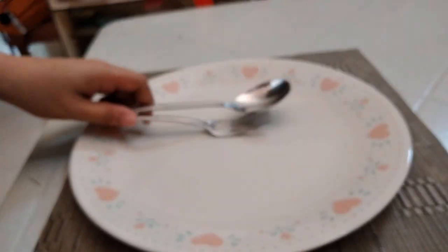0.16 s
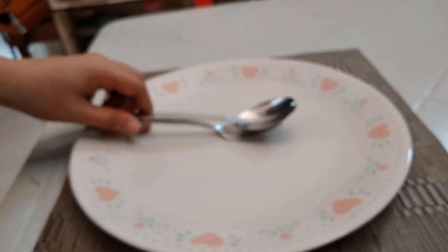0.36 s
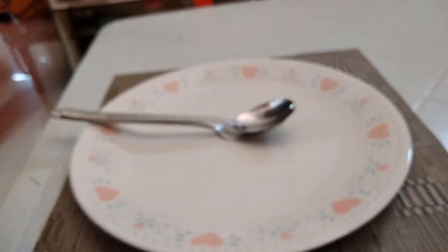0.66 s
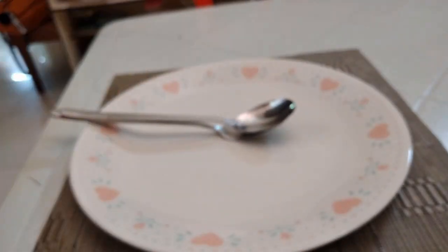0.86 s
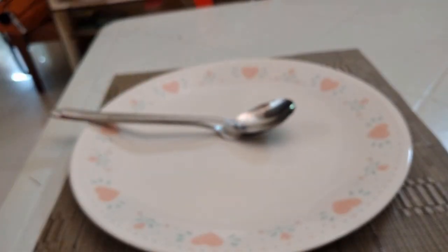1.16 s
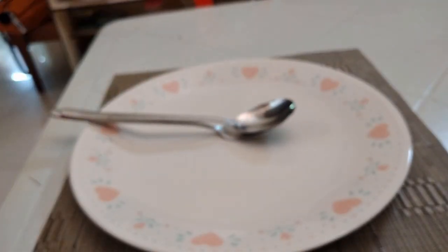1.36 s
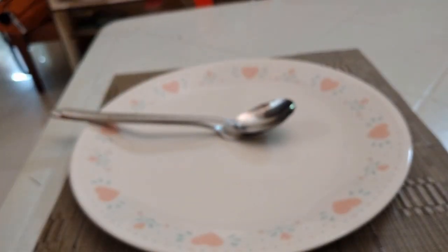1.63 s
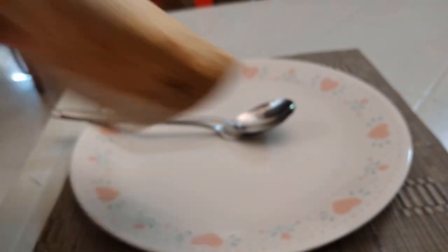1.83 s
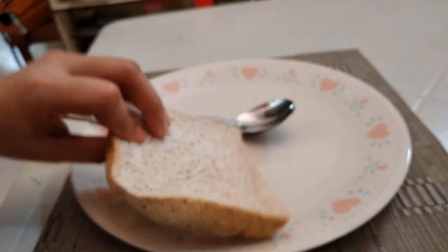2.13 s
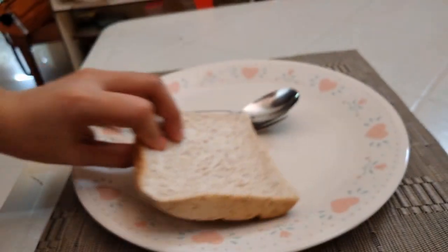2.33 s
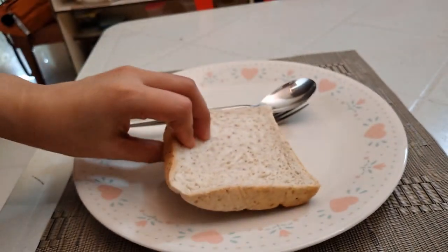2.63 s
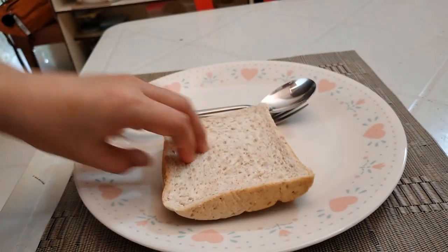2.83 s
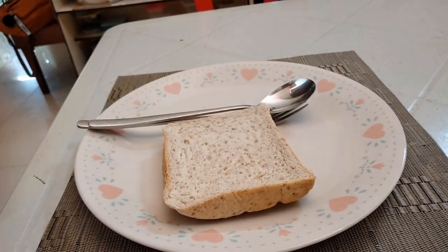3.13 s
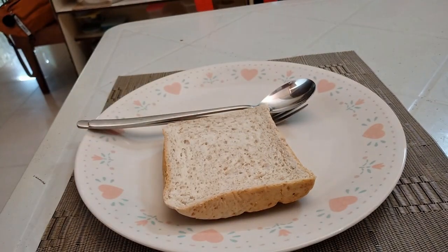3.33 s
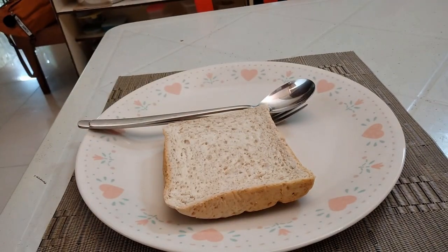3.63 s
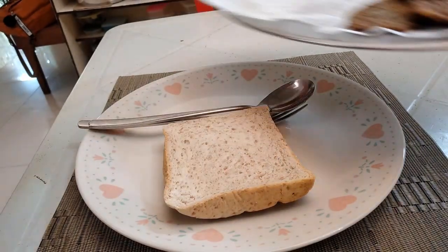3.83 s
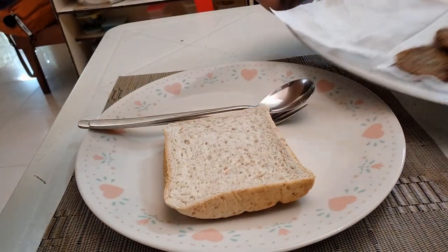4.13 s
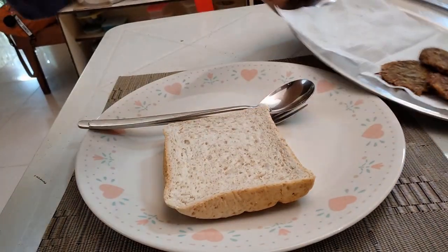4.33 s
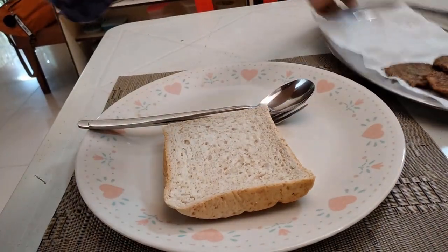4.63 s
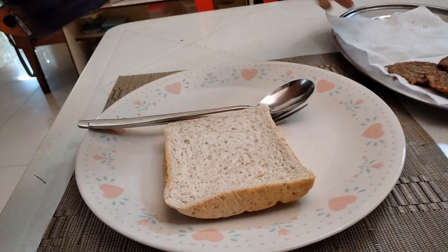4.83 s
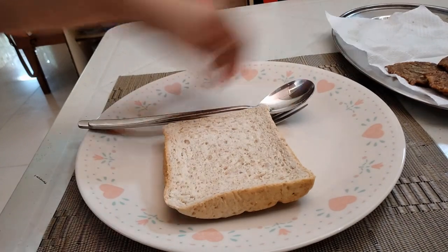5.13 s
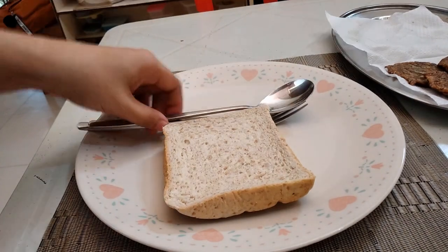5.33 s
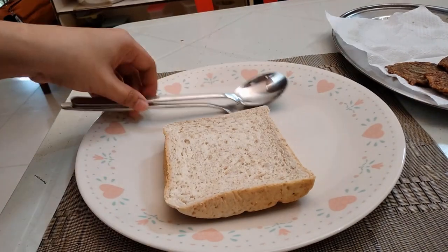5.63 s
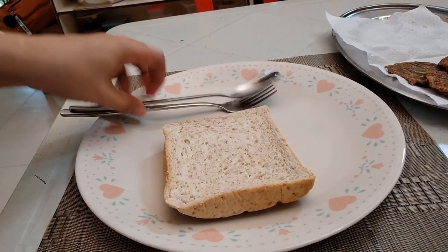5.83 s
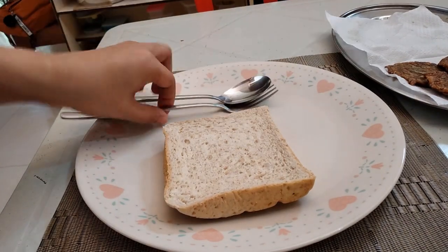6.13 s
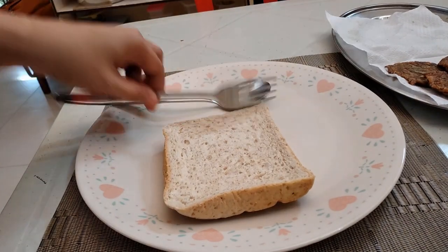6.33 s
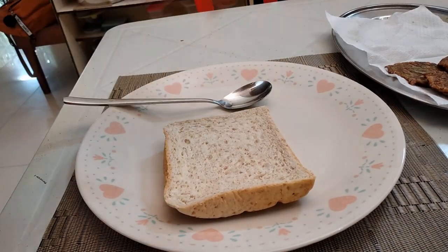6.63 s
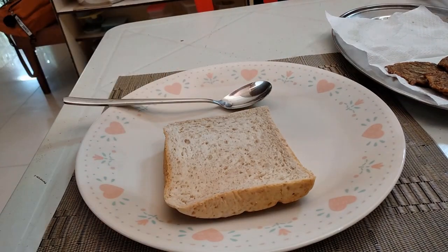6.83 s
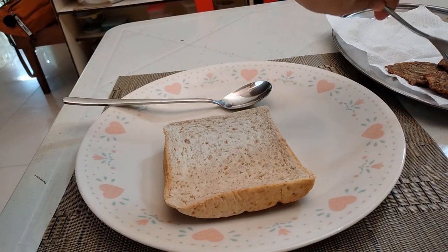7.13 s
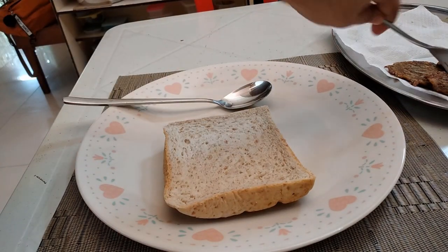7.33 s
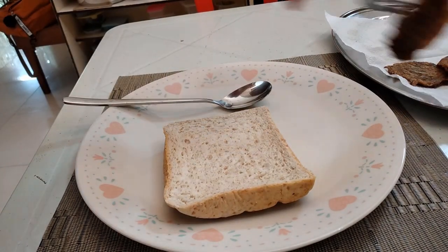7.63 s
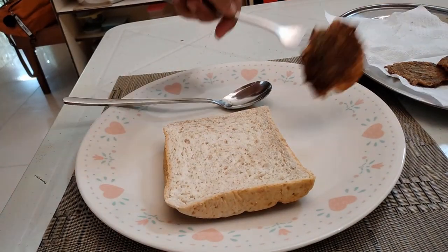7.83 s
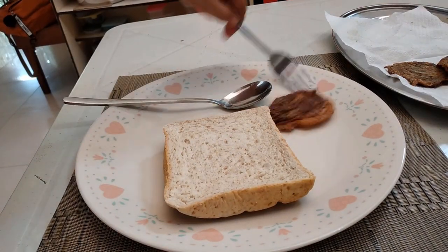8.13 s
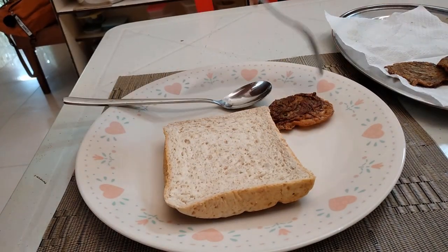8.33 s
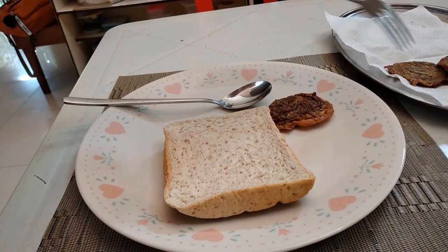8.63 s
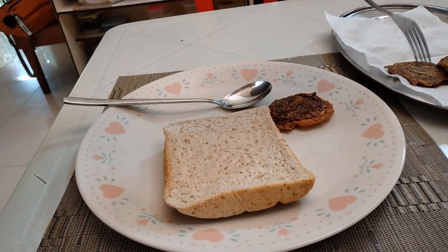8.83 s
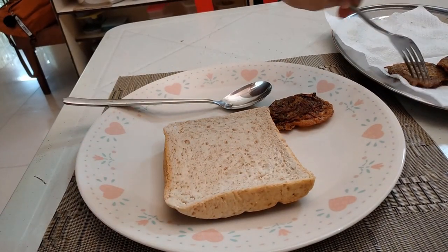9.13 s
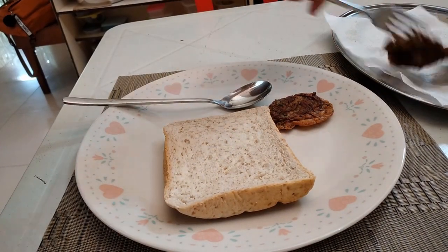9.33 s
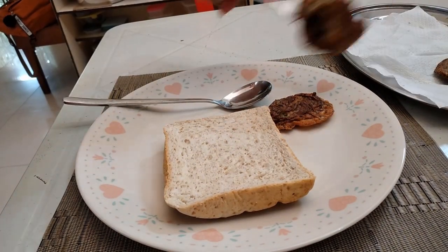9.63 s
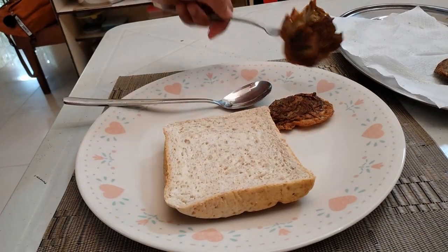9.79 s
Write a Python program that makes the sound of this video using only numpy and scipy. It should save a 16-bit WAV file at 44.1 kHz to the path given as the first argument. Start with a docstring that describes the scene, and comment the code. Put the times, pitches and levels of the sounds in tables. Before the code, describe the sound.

In a hard-walled room, cutlery drops on a plate, a wrapper crinkles, a dragged object groans, a tray thuds, and steel clatters apart.

```python
"""Over a quiet hum and rumble, a spoon and fork tap, then drop on a glass-ceramic plate in a hard-walled room.
Wrapping rustles amid soft thuds, then a hollow object is dragged over the table by stick and slip.
Next a metal tray is set down with a few knocks; the cutlery is rattled apart; a fork lifts food off paper.
Contacts are pulses, noise bursts and decaying modes; rubbing is coloured grains; squeaks are gliding resonances.
All sounds but the hum and rumble also feed a diffuse reverberant tail."""
import sys
import numpy as np
from scipy import signal
from scipy.fft import rfft, irfft
from scipy.io import wavfile
from scipy.ndimage import uniform_filter1d, map_coordinates

SR = 44100
rng = np.random.default_rng(int(sys.argv[2]) if len(sys.argv) > 2 else 0)


def master(y):
    """Save y as 16-bit WAV."""
    cut = np.clip(np.atleast_2d(y).T, -1, 1)
    pcm = np.round(cut * 32767)  # scale
    wavfile.write(sys.argv[1], SR, pcm.astype(np.int16))


N = 439236

# All levels in the tables are relative; each layer has its own gain.
# Stationary background spectra. Each row: frequency in Hz, density in dB per Hz.
ROOM_TONE = [(65, -24), (110, -1), (135, -2.5), (210, -6), (265, -4), (400, -12), (500, -12), (650, -15.5),
             (900, -18.5), (2200, -23), (3000, -34), (4000, -36), (7100, -30.5), (11000, -45),
             (16000, -49.5)]
RUMBLE = [(15, -2), (35, 5), (60, -2), (100, -2.5), (140, -17), (400, -53.5), (2000, -89.5)]
# Course of the low rumble. Each row: time in seconds, level in dB.
RUMBLE_LEVEL = [(0, -51.5), (.9, -51.5), (1.7, -56), (3.4, -59.5), (4.2, -56), (5.3, -58.5), (6.2, -48),
                (6.7, -51.5), (7.6, -52), (8.8, -51.5), (9.96, -59)]
HUM_DB = -53
DRONE_HZ, DRONE_WIDTH_HZ, DRONE_DB = 268.3, 6, -66.5  # one narrow tone stands out of the hum

# Correlation of the two microphone ports. Each row: frequency in Hz, likeness (clipped where it is used).
LIKENESS = [(30, 0.5), (70, 2.5), (160, 1.1), (300, 0.9), (550, 0.3), (1200, -0.14), (2500, 0.04),
            (6000, -0.04), (16000, 0.93)]
# Balance of sounds on the plate and of other sounds. Each row: frequency in Hz, left-right difference in dB.
PLATE_SIDE = [(200, -6), (700, 3), (1300, 0), (2400, -1), (4400, 1.5), (7200, 11.5), (9000, -3.5),
              (11000, -13.5), (15000, -16.5)]
FAR_SIDE = [(200, 0.5), (1300, 0), (2400, 1), (4400, 2), (7500, 9.5), (10000, -17), (15000, -15)]
# Reverberant tail. Each row: frequency in Hz, t60 in seconds, level in dB.
TAIL = [(60, 1, -12), (200.7, 0.39, -8), (599.6, 0.71, -9.5), (1540, 0.88, -10.5), (3040, 0.68, -5.5),
        (6995, 0.64, -10.5), (15030, 0.94, -17.5)]
CUTOFF_HZ = 15700

# Strokes of wrapping, sleeve and paper.
# Each row: nominal start in seconds, length in seconds, body level in dB, crinkle level in dB.
RUSTLES = [(0.853, 0.23, -47.5, -47.5), (1.095, 0.27, -47.5, -50), (1.309, 0.19, -44.5, -43),
           (1.437, 0.22, -50, -51.5), (2.9, .2, -57.5, -63), (3.13, 0.084, -58, -73),
           (3.385, 0.17, -63, -74.5), (3.584, 0.13, -52, -54), (3.689, 0.13, -48, -50.5),
           (5.56, 0.13, -57.5, -57), (5.724, 0.18, -62.5, -65.5), (6.863, 0.28, -68.5, -70),
           (7.58, 0.23, -63, -67.5), (7.829, 0.13, -84, -68), (8.53, 0.18, -60.5, -69.5),
           (8.961, 0.092, -64, -70), (9.208, 0.17, -62, -70), (9.562, 0.088, -76, -68.5),
           (9.7, 0.26, -63, -66)]
STROKE_SHAPE = 2.2  # squareness of each stroke's swell
FLUTTER_DB, FLUTTER_PER_S = 1.8, 140  # unevenness of the rubbing
# Single creases snapping. Each row: time in seconds, level in dB.
SNAPS = [(0.865, -41), (1.049, -43.5), (1.63, -44), (1.675, -42), (2.09, -46.5), (2.59, -49),
         (2.8243, -49.5), (3.105, -52), (3.1695, -54.5), (3.445, -55), (3.5716, -50), (3.6, -40),
         (3.7073, -45.5), (3.7372, -40)]
# Spectra of the rubbing and of the crinkling. Each row: frequency in Hz, density in dB per Hz.
RUSTLE_BODY = [(100, -2.5), (400, -3.5), (900, -6), (1500, -6.5), (2400, -5.5), (3400, -19.5), (5000, -18),
               (16000, -62)]
RUSTLE_CRINKLE = [(1000, -26.5), (3000, -7.5), (4500, -8), (7200, -0.5), (8800, -7), (11000, -5),
                  (13000, -20.5), (16000, -18)]

# A hollow object dragged over the table, its force fading.
DRAG_START_S, DRAG_STOP_S, DRAG_ATTACK_S, DRAG_RELEASE_S = 1.783, 2.872, 0.017, 0.24
DRAG_DB, DRAG_FADE_DB_PER_S = -37.5, 10.5
HISS_DB, HISS_FOLLOWS = -30, 0.76  # hiss level at unit judder; exponent on the judder
DRAG_WOBBLE_S, DRAG_WOBBLE_PER_S = 0.00094, 9  # its pitch wavers as the contact shifts
# It sticks, then breaks free. Each row: time in seconds, slip level in dB, judder surge in dB.
SHOVES = [(1.786, -25.5, -28.5), (1.807, -23, -36.5), (1.973, -27, -40), (2.054, -28.5, -43.5),
          (2.085, -35.5, -35.5), (2.117, -35, -34), (2.149, -27.5, -39), (2.186, -35.5, -41.5)]
SURGE_T60_S = 0.44
# Resonances of the hollow body. Each row: frequency in Hz, width in Hz, level in dB.
DRAG_BODY = [(344, 104, -4), (569, 270, -19), (693, 134, 3.5), (898.5, 9.7, 11.5), (1100, 84, -7),
             (1406, 23, 3), (1800, 110, -7.5), (2206, 29, -4), (2560, 19, -1.5), (2336, 50, -8),
             (2740, 28, -6.5), (3450, 38, -12.5)]
# Spectrum of the contact hiss. Each row: frequency in Hz, density in dB per Hz.
DRAG_HISS = [(1470, -29), (2500, -2.5), (3160, -17), (3460, -11.5), (5740, -9.5), (7020, -4.5),
             (10600, -20), (16000, -43)]
# The main resonance shifts with the pull. Each row: time in seconds, frequency in Hz.
GROAN_PITCH = [(1.79, 700), (1.85, 740), (1.93, 690), (2.0, 804), (2.14, 800), (2.5, 784), (2.68, 720)]

# Squeaks and scrapes of things rubbing. Each row: start in seconds, length in seconds, first frequency in Hz,
# last frequency in Hz, width in Hz, level in dB, room feed in dB relative to the direct sound.
SQUEAKS = [(2.915, 0.12, 1520, 1750, 710, -53.5, 8), (2.924, 0.1, 2960, 2600, 414, -55, 8.5),
           (2.917, 0.19, 5610, 5610, 250, -67.5, 3.5), (2.745, .1, 2380, 2380, 200, -59, 3),
           (5.093, 0.024, 1630, 1530, 60, -43, 6), (6.347, 0.02, 1950, 2010, 301, -40, 2),
           (6.358, .024, 2550, 2650, 340, -36, 2), (6.4, 0.014, 4500, 9200, 1188, -38.5, 3),
           (8.379, .04, 6800, 7300, 2200, -57, 6), (8.365, .06, 7100, 7100, 350, -53.5, -0.5),
           (9.17, 0.1, 1650, 1800, 600, -63.5, 6), (9.29, .1, 3600, 4000, 870, -70.5, 12),
           (9.285, 0.12, 2200, 2900, 900, -61, 5), (9.385, 0.1, 2500, 3300, 550, -59.5, 4)]
SQUEAK_JUDDER_DB, SQUEAK_JUDDER_PER_S = 3.5, 210  # stick and slip

# Things set down on the table. Each row: time in seconds, table thud in dB, tray clack in dB, rim scratch in dB,
# favoured mode in Hz, its level in dB, its t60 in seconds.
KNOCKS = [(0.395, -47, -59.5, -59.5, 75, -29.5, 0.16), (0.499, -35.5, -42.5, -39, 178, -22, 0.085),
          (0.506, -40, -56, -54, 96, -29, 0.26), (0.51, -40.5, -55, -56, 36, -29.5, .15),
          (1.121, -35, -39, -47, 477, -33, 0.24), (1.137, -30, -51, -63.5, 138, -32.5, 0.23),
          (1.176, -34.5, -59.5, -60, 168, -35, 0.17), (4.4115, -27, -21, -29, 2345, -26, .05),
          (4.445, -31, -35, -34.5, 62, -29, .15), (4.491, -19.5, -27, -44.5, 270, -27, 0.18),
          (4.524, -34, -41, -53, 397, -36.5, .12), (4.7805, -13.5, -15.5, -35.5, 332, -14.5, 0.086),
          (4.7824, -24, -29.5, -51.5, 166, -17, 0.14), (4.808, -25, -46, -54, 398, -27, .14),
          (4.856, -37, -37, -61.5, 298.4, -32, .08), (4.9057, -27.5, -33.5, -71.5, 1710, -34, .04),
          (4.9139, -36.5, -45.5, -80, 162, -20, .1), (4.998, -38, -48.5, -75, 174.6, -34, .1),
          (8.1357, -39, -36, -69.5, 112, -42, 0.11)]
# Modes of table top and tray. Each row: frequency in Hz, level in dB, t60 in seconds, left-right in dB.
TABLE_MODES = [(40, -9.5, 0.41, 0.0041), (83.9, -11, 0.086, 0.0048), (125, -7, 0.1, 0.0045),
               (165.5, 5, 0.071, 0.0048), (268.5, -8, 0.33, 0.0014), (301, -3, 0.099, 0.0036),
               (404, -10, 0.16, 0), (519, -10, 0.1084, 0.0076)]
TRAY_MODES = [(630, -11.5, 0.14, 0.0016), (1083, -7, 0.63, 0.0034), (1600, -26, 0.63, 0.0077),
              (1210, 0, 0.07, 0.0021), (1600, 6.5, 0.04, 0.0034), (1690, -1, 0.046, 0.0045),
              (1834, 4, 0.049, 0.0056), (2090, -19, 0.22, 0.00054), (2345, -18.5, 0.19, 0.018)]
# The crowd of quickly damped modes in each body. Each row: frequency in Hz, density in dB per Hz.
TABLE_CRACK = [(20, -6), (45, -0.5), (90, 0), (160, -1), (300, -5), (550, -10), (1000, -17), (3000, -51),
               (16000, -101)]
TRAY_CRACK = [(100, -10), (500, -11), (1000, 2), (1700, 3.5), (2400, 6), (3100, -23), (5000, -52.5),
              (16000, -72.5)]
RIM_CRACK = [(500, -40.5), (2500, -2), (4200, -2.5), (7000, 1.5), (9000, -10.5), (12000, -16.5),
             (16000, -37)]
PLATE_CRACK = [(60, -8), (170, -4.5), (450, -12.5), (900, -7.5), (1600, -2.5), (2300, -1), (3200, -6),
               (4500, -15), (7000, -26), (16000, -51)]
STEEL_CRACK = [(300, -27.5), (2000, -14), (3400, -4), (4300, 4), (5550, -2.5), (6200, 2.5), (6700, -0.5),
               (7100, 8), (7700, -4), (8100, -5.5), (8800, -9), (11000, -13), (13500, -27), (16000, -29.5)]

# Taps of hand-held cutlery, where one mode survives the grip. Each row: time in seconds, plate level in dB,
# steel level in dB, favoured mode in Hz, its level in dB, its t60 in seconds.
TAPS = [(0.1371, -38, -49, 4124, -42, .28), (.141, -32.5, -48, 2803, -43.5, 0.2),
        (0.246, -35, -38.5, 13250, -48, 0.15), (0.2621, -38, -39.5, 2033, -34, 0.11),
        (0.272, -47.5, -41.5, 4150, -43.5, .2), (0.28, -45.5, -44.5, 2740, -46.5, 0.17),
        (0.396, -23.5, -28, 4188, -24.5, .03), (.413, -36, -49.5, 2207, -37, .03),
        (0.426, -37.5, -48.5, 2046, -36, .025), (8.14, -43.5, -55, 1598, -53, 0.11),
        (8.148, -46.5, -50.5, 2660, -48, .06), (8.252, -51, -44.5, 7060, -33, 0.14),
        (8.259, -45, -49, 11000, -53, 0.18)]
# Contacts of loose cutlery, with the same columns: time in seconds, plate in dB, steel in dB,
# favoured mode in Hz, its level in dB, its t60 in seconds.
CLINKS = [(0.4983, -20, -19, 6975, -17.5, 0.06), (0.5045, -30, -26.5, 6450, -19, .07),
          (0.5112, -27.5, -28, 7490, -21, 0.055), (0.519, -37, -26, 6920, -19.5, .06),
          (0.526, -38.5, -32, 7380, -32, .06), (5.823, -43.5, -52.5, 2014, -53, .05),
          (5.882, -50, -55.5, 7200, -58.5, .1), (5.902, -41, -50.5, 2310, -53, .1),
          (5.9454, -25, -27.5, 712, -20, 0.04), (5.9504, -22.5, -27.5, 1190, -17, 0.04),
          (5.9568, -23, -19.5, 6980, -24, 0.08), (5.9636, -19, -25.5, 7960, -29, .1),
          (6.0641, -23, -16.5, 7150, -20, 0.06), (6.066, -28, -29, 700, -26, 0.062),
          (6.077, -29.5, -27.5, 4448, -24, 0.08), (6.0885, -29, -18, 6385, -19, 0.13),
          (6.1066, -24.5, -27, 6650, -25.5, 0.068), (6.1305, -28.5, -27, 5963, -20.5, 0.075),
          (6.1705, -32.5, -30.5, 6340, -29.5, 0.078), (6.2163, -36.5, -34, 2524, -37.5, 0.12),
          (6.3445, -37.5, -49.5, 1964, -41.5, .05), (6.3744, -34, -28.5, 4494, -36, 0.11),
          (6.4, -32.5, -35.5, 8750, -39.5, 0.08), (6.4218, -29, -30, 10300, -33.5, 0.04),
          (6.438, -15.5, -18, 6170, -13.5, 0.035), (6.4461, -17.5, -25.5, 8000, -21, .07),
          (6.451, -20.5, -23, 2257, -20.5, 0.086), (6.461, -24, -27, 6970, -23, .07),
          (6.4823, -27, -30.5, 2520, -23.5, .08), (6.488, -25.5, -26.5, 2276, -22, .08),
          (6.502, -32, -23.5, 5780, -16, 0.051), (6.5165, -26, -28.5, 6200, -17, .07),
          (6.533, -31, -22, 5900, -21, 0.044), (6.5688, -30.5, -35, 2383, -48, 1),
          (6.613, -34, -50, 2570, -55, 0.46)]
# Dry clacks of steel pressed onto the plate.
# Each row: time in seconds, level in dB, frequency in Hz, swell in milliseconds.
CLACKS = [(0.1371, -25.5, 1500, .5), (0.3947, -6.5, 2000, .55), (0.398, -16.5, 2300, .2),
          (6.4209, -4, 2300, .22), (6.4273, -6, 2900, .17), (6.4312, -5.5, 2500, .3),
          (6.4376, -8.5, 2200, .3), (6.4513, -7.5, 2200, 0.24), (6.4556, -8, 2300, .25),
          (6.4656, -16, 2300, .35), (6.4829, -20.5, 2500, 0.28), (6.4883, -17, 2200, 0.53),
          (6.51, -16, 2300, 0.33), (6.526, -11.5, 2500, .25)]
CLACK_LEAD_RAD, CLACK_SIDE_DB = .4, -1  # phase lead left and lag right; left-right level
# Loose spoon and fork chattering on the plate. Each row: start in seconds, length in seconds, plate level in dB,
# steel level in dB, table level in dB, plate fade in dB/s, steel fade in dB/s.
RATTLES = [(0.497, 0.014, -33.5, -24, -38, 300, 451.5), (5.9443, 0.03, -23, -18, -32, 280.5, 198),
           (6.0773, 0.11, -25.5, -20.5, -40.5, 106.5, 70.5), (6.443, 0.044, -23, -20, -43, 184.5, 233.5),
           (6.501, .09, -26.5, -29, -48.5, 82, 71)]
CHATTER_GAP_S, CHATTER_JITTER = .011, 0.32  # jitter as a share of the gap
CHATTER_SCATTER_DB, SETTLE_DB_PER_S = 2, 601  # greatest scatter either way; final fade
# Modes of plate, spoon, fork and gripped handle.
# Each row: frequency in Hz, level in dB, t60 in seconds, left-right in dB.
PLATE_MODES = [(808, -16, 0.11, -0.5), (1188, -13.5, 0.14, -5.5), (1475, -5.5, 0.1, 2),
               (1730, -12, 0.042, -2.5), (2020, -7, 0.03, 3), (2180, -3.5, 0.011, -2), (2247, 4, 0.013, 3),
               (2600, -6.5, 0.054, 1.5), (2900, -16, 0.083, 6), (3517, -2, 0.03, 2)]
SPOON_MODES = [(4144, -7, .2, 5), (5020, -5, .17, 0), (5988, -3, .2, 6), (6175, -8, .2, 3),
               (6385, -3, .22, 10), (6955, -3, .15, 10), (7015, 0, .15, 10), (8118, -6, .18, 4),
               (9283, -22, .22, -5), (10562, -12, .25, -20), (10920, -22, .2, -15), (11866, -13, .22, -18),
               (12428, -18, .22, -16), (13320, -23, .25, -11), (15050, -31, .2, 1)]
FORK_MODES = [(2240, 0, .22, -7), (2325, -4, .18, -4), (2483, 1, .27, -4), (2606, -2, .27, 0),
              (4312, -7, .2, -1), (4490, -6, .17, 1), (5028, -10, .2, 0), (5963, 3, .22, 7),
              (6087, -3, .17, 4), (7128, 0, .22, 11), (7854, -11, .2, 5), (10290, -17, .2, -7),
              (13660, -21, .15, -14)]
HANDLE_MODES = [(785, -2.5, .3, 0), (1430, -1.5, 0.23, 3.5), (2800, -3.5, .22, 0.5),
                (3340, -10.5, 0.16, 2.5), (5047, -10.5, 0.27, 8.5)]
# The many weak overtones of the steel.
CROWD_LOW_HZ, CROWD_HIGH_HZ, CROWD_T60_S = 2850, 12850, 0.13
PARTED_S = 5.5
NESTED_DB = -10.5  # until they are parted, the spoon lies nested in the fork, which damps its ring


def from_db(db):
    """Amplitude ratio from its logarithmic level."""
    return 10 ** (np.asarray(db) / 20)


def rms_one(x):
    """Normalization to unit root-mean-square."""
    return x / np.sqrt(np.mean(x ** 2) + 1e-20)


def at_hz(points, hz, axis=1):
    """Interpolation of one table column on a logarithmic frequency axis."""
    points = np.array(points, float)
    return np.interp(np.log(np.maximum(hz, 1)), np.log(points[:, 0]), points[:, axis])


def convolve(x, response):
    """Linear filtering as convolution with an impulse response."""
    x, response = np.float32(x), np.float32(response)
    return signal.oaconvolve(np.atleast_2d(x), np.atleast_2d(response), axes=-1)[:, :N]


def causal(gain):
    """Minimum-phase response: folding the cepstrum gives the given gain per frequency causally."""
    cepstrum = irfft(np.log(gain + 1e-7))
    half = cepstrum.shape[-1] // 2
    cepstrum[..., 1:half] *= 2
    cepstrum[..., half + 1:] = 0
    return irfft(np.exp(rfft(cepstrum)))


def panned(db):
    """Constant-power panning: left and right gains for a level difference."""
    pair = from_db(np.array([db, -db]) / 2)
    return pair / np.sqrt(np.mean(pair ** 2, axis=0))


def colour(pair, spectrum, balance, size=4096):
    """Spectral shaping and partial correlation turn two unrelated white signals into one stereo sound."""
    hz = np.fft.rfftfreq(size, 1 / SR)
    alike = np.clip(at_hz(LIKENESS, hz), -.98, .98)
    mid, side = convolve(pair, causal(np.sqrt(np.array([1 + alike, 1 - alike]) / 2)))
    gain = rms_one(from_db(at_hz(spectrum, hz)))
    return convolve([mid + side, mid - side], causal(gain * panned(at_hz(balance, hz))))


def white():
    """White noise: two unrelated signals of flat spectrum."""
    return rng.standard_normal((2, N))


def grains(per_s, spread_db):
    """Shot noise: random tiny clicks of uneven size, scaled to unit rms."""
    sizes = from_db(spread_db * np.minimum(rng.exponential(1, N), 4))
    return rms_one((rng.random(N) < per_s / SR) * sizes * white())


def drift(per_s):
    """Smooth random modulation: wandering of spread about 1 between per_s knots a second."""
    knots = rng.standard_normal(4000)
    return map_coordinates(knots, [np.arange(N) / SR * per_s], order=3, mode="wrap")


def wobble(x, depth_s, per_s):
    """Doppler effect: a wandering delay bends the pitch slightly."""
    at = np.arange(N) + depth_s * SR * drift(per_s)
    return np.array([map_coordinates(channel, [at], order=3) for channel in x])


def moving_resonance(x, hz, width_hz):
    """Heterodyning: a low-pass in the rotating frame is a resonance whose centre follows hz."""
    turn = np.exp(2j * np.pi * np.cumsum(hz) / SR)
    r = np.exp(-np.pi * width_hz / SR)
    return np.real(turn * signal.lfilter([np.sqrt(2 * (1 - r * r))], [1, -r], x / turn + 1e-18))


def clicks(times, sizes):
    """Ideal impulses: one of the given size at each time."""
    out = np.zeros(N, np.asarray(sizes).dtype)
    out[np.clip(np.round(np.asarray(times) * SR).astype(int), 0, N - 1)] = sizes
    return out


def decaying_power(times, db, t60):
    """Exponential energy decay by 60 dB in t60 seconds after each event."""
    return signal.lfilter([1], [1, -from_db(-120 / (t60 * SR))], clicks(times, from_db(db) ** 2) + 1e-22)


def crack(times, db, t60, snap):
    """Impact on a body of dense modes: one sharp impulse and a quickly decaying burst of noise."""
    burst = np.sqrt(decaying_power(times, db, t60)) * white()
    return burst + snap * clicks(times, from_db(db)) * [[1], [0]]


def ring(times, db, modes, scatter_db, detune):
    """Modal synthesis: each contact excites every mode by its own amount, slightly detuned by its supports."""
    out = np.zeros((2, N))
    for hz, mode_db, t60, pan_db in modes:
        chance = rng.standard_normal((len(times), 3))
        sizes = from_db(db + mode_db + scatter_db * chance[:, 0]) * np.sign(chance[:, 1])
        t = np.arange(int(min(t60, 1) * SR)) / SR
        # the less alike the two ports, the further out of step
        lead = np.arccos(np.clip(at_hz(LIKENESS, hz), -1, 1)) / 2 * np.float32([[1], [-1]])
        fade = from_db(-60 * t / t60) * panned(pan_db)[:, None]
        for s, size, shift in zip(times, sizes, 1 + detune * chance[:, 2]):
            i = int(round(s * SR))
            tone = np.sin((2 * np.pi * hz * shift * t + lead).astype(np.float32)) * fade
            out[:, i:i + len(t)] += size * tone[:, :N - i]
    return out


def favoured(rows, side):
    """Point excitation: the place of each contact makes one mode ring out above the rest."""
    out = np.zeros((2, N))
    for at, *_, hz, db, t60 in rows:
        out += ring([at], db, [(hz, 0, t60, at_hz(side, hz))], scatter_db=-1.0, detune=0)
    return out


def rebounds(times, db, count, gap_s, loss_db):
    """Inelastic bouncing: each contact is followed by a few uneven, ever weaker rebounds."""
    chance = rng.random((len(times), count, 2))
    later = times[:, None] + np.cumsum(gap_s * (0.3 + 1.5 * chance[..., 0]), axis=1)
    weaker = db[:, None] - np.cumsum(2 * loss_db * chance[..., 1], axis=1) - loss_db
    return np.append(times, later), np.append(db, weaker)


def bounced(rows, gap_s, loss_db):
    """Double impact: each (s, dB, ..) contact lands again, lower by loss_db; returns the columns."""
    first = np.array(rows, float)
    second = np.column_stack([first[:, 0] + gap_s, first[:, 1:] - loss_db])
    return np.vstack([first, second]).T


def room_tone():
    """Stationary noise: a dull steady hum with one narrow drone, over low rumble that rises and falls."""
    rumble = from_db(np.interp(np.arange(N) / SR, *np.transpose(RUMBLE_LEVEL)))
    drone = moving_resonance(rng.standard_normal(N), np.full(N, DRONE_HZ), DRONE_WIDTH_HZ)
    out = from_db(DRONE_DB) * rms_one(drone) + colour(rumble * white(), RUMBLE, FAR_SIDE)
    return out + from_db(HUM_DB) * colour(white(), ROOM_TONE, FAR_SIDE)


def room(x, build_s):
    """Reverberation: reflections thicken into a diffuse tail that decays at its own rate in each octave."""
    t = np.arange(SR) / SR
    hz = np.fft.rfftfreq(SR, 1 / SR)
    alike = .86 * np.sinc(hz / 1100)  # long waves reach both ports alike
    mid, side = rfft(rng.standard_normal((2, SR)))
    noise = np.sqrt(1 + alike) * mid + np.sqrt(1 - alike) * side * [[1], [-1]]
    tail = 0
    for centre in 2. ** np.arange(5, 15):
        share = np.clip(1 - abs(np.log2(np.maximum(hz, 1) / centre)), 0, 1)
        fade = from_db(-60 * t / at_hz(TAIL, centre)) * (1 - np.exp(-(t / build_s) ** 2))
        level = from_db(at_hz(TAIL, centre, axis=2))
        tail = tail + irfft(noise * share) * fade / np.linalg.norm(fade) * level
    return convolve(x, tail / np.sqrt(2))


def rustle():
    """Friction of thin sheets: dense soft grains under sparser bright ones swell and fade with each stroke."""
    t, power = np.arange(N) / SR, np.zeros((2, N))
    for start, length, body_db, crinkle_db in RUSTLES:
        from_middle = np.abs(2 * (t - start) / length - 1)
        near = from_middle < 2
        swell = np.exp(-from_middle[near] ** STROKE_SHAPE)
        power[:, near] += (from_db([[body_db], [crinkle_db]]) * swell) ** 2
    body, crinkle = np.sqrt(power) * from_db(FLUTTER_DB * drift(FLUTTER_PER_S))
    rub = from_db(2.5) * colour(body * grains(per_s=7000, spread_db=1.5), RUSTLE_BODY, FAR_SIDE)
    bright = colour(crinkle * grains(per_s=4000, spread_db=1.5), RUSTLE_CRINKLE, FAR_SIDE)
    return rub + from_db(0.5) * bright


def crinkle_snaps():
    """Snap-through buckling: single creases of the wrapping flip over with a tiny bright tick."""
    s, db = np.transpose(SNAPS)
    return from_db(-1.0) * colour(crack(s, db, t60=0.012, snap=3.7), RUSTLE_CRINKLE, FAR_SIDE)


def drag_force():
    """Kinetic friction: a pull that fades as the object slows, with a dying surge after each shove."""
    t = np.arange(N) / SR
    onset, release = (t - DRAG_START_S) / DRAG_ATTACK_S, (DRAG_STOP_S - t) / DRAG_RELEASE_S
    moving = np.clip(np.minimum(onset, release), 0, 1)
    pull = from_db(DRAG_DB - DRAG_FADE_DB_PER_S * (t - DRAG_START_S))
    s, _, surge_db = np.transpose(SHOVES)
    return moving * np.sqrt(pull ** 2 + decaying_power(s, surge_db, SURGE_T60_S))


def drag():
    """Stick and slip excites the resonances of a hollow body; the rough contact hisses."""
    judder = drag_force()
    hiss = from_db(HISS_DB) * judder ** HISS_FOLLOWS
    s, slip_db, _ = np.transpose(SHOVES)
    hz = np.geomspace(60, 16000, num=900)
    power = sum(from_db(db) ** 2 / (1 + ((hz ** 2 - f ** 2) / (hz * width)) ** 2)
                for f, width, db in DRAG_BODY)
    body = np.transpose([hz, 10 * np.log10(power / (1 + (hz / 3800) ** 4))])
    friction = from_db(1.0) * judder * grains(per_s=700, spread_db=1.84)
    friction += from_db(-4.5) * crack(s, slip_db, t60=0.01, snap=8.6)
    pitch = np.interp(np.arange(N) / SR, *np.transpose(GROAN_PITCH))
    out = from_db(-5.5) * moving_resonance(friction, pitch, width_hz=55)
    out += from_db(-2.0) * wobble(colour(friction, body, FAR_SIDE), DRAG_WOBBLE_S, DRAG_WOBBLE_PER_S)
    return out + from_db(5.5) * colour(hiss * grains(per_s=2200, spread_db=1.5), DRAG_HISS, FAR_SIDE)


def squeaks():
    """Uneven friction drives one gliding resonance, fast to swell, slower to fade; returns direct and feed."""
    direct, feed = np.zeros((2, 2, N))
    for start, length, first_hz, last_hz, width, db, room_db in SQUEAKS:
        n, i = int(length * SR), int(start * SR)
        # a quarter second of lead-in lets the resonance settle
        hz = np.append(np.full(SR // 4, first_hz), np.geomspace(first_hz, last_hz, n))
        once = moving_resonance(rng.standard_normal(len(hz)), hz, width)
        tone = moving_resonance(once, hz, width)[-n:]
        at = np.arange(n) / SR * SQUEAK_JUDDER_PER_S
        judder = from_db(SQUEAK_JUDDER_DB * np.interp(at, np.arange(200), rng.standard_normal(200)))
        sound = from_db(db) * rms_one(tone * judder) * np.sin(np.pi * np.sqrt(np.arange(n) / n))
        direct[:, i:i + n] += sound
        feed[:, i:i + n] += from_db(room_db) * sound
    return direct, feed


def knocks():
    """Impact excitation: the table top booms, the tray clacks and its rim scratches."""
    s, thud_db, clack_db, rim_db = bounced([knock[:4] for knock in KNOCKS], gap_s=.0062, loss_db=14.5)
    table = from_db(1.0) * colour(crack(s, thud_db, t60=0.05, snap=13.0), TABLE_CRACK, FAR_SIDE)
    table += from_db(-7.0) * ring(s, thud_db, TABLE_MODES, scatter_db=2.0, detune=0.005)
    tray_hits = rebounds(s, clack_db, count=2, gap_s=0.0078, loss_db=9.5)
    tray = from_db(4.0) * colour(crack(*tray_hits, t60=0.008, snap=3.9), TRAY_CRACK, FAR_SIDE)
    tray += from_db(-12.5) * ring(s, clack_db, TRAY_MODES, scatter_db=6.5, detune=0.0026)
    rim = from_db(1.5) * colour(crack(s, rim_db, t60=0.095, snap=4.7), RIM_CRACK, FAR_SIDE)
    return table + tray + rim + favoured(KNOCKS, FAR_SIDE)


def table_shake(rattles):
    """Structure-borne sound: the chatter passes through the mat and makes the table top rumble."""
    s, _, _, table_db = rattles.T
    return colour(crack(s, table_db, t60=0.085, snap=1.3), TABLE_CRACK, FAR_SIDE)


def taps():
    """Damping by the grip: held cutlery touches twice in quick succession and one mode stands out."""
    # the second touch is 1 dB stronger
    s, plate_db, steel_db = bounced([tap[:3] for tap in TAPS], gap_s=0.0025, loss_db=-1.0)
    out = from_db(2.5) * colour(crack(s, plate_db, t60=0.0056, snap=9.8), PLATE_CRACK, FAR_SIDE)
    out += from_db(-9.0) * ring(s, plate_db, PLATE_MODES, scatter_db=6.0, detune=0.0046)
    steel_hits = rebounds(s, steel_db, count=2, gap_s=0.0041, loss_db=9.0)
    out += from_db(3.0) * colour(crack(*steel_hits, t60=0.012, snap=6.4), STEEL_CRACK, FAR_SIDE)
    out += from_db(-22.0) * ring(s, steel_db, FORK_MODES, scatter_db=8.0, detune=0.064)
    handle_db = np.minimum(plate_db, -36)
    out += from_db(-15.5) * ring(s, handle_db, HANDLE_MODES, scatter_db=3.5, detune=0.015)
    return out + favoured(TAPS, FAR_SIDE)


def clacks():
    """Contact damping: steel pressed onto the plate cannot ring, so each hit is a dry pulse of a few cycles."""
    out, t = np.zeros((2, N)), np.arange(SR // 50) / SR
    lead = CLACK_LEAD_RAD * np.array([[1], [-1]])
    for s, db, hz, swell_ms in CLACKS:
        age, i = t * 1000 / swell_ms, int(round(s * SR))
        envelope = from_db(db) * age * np.exp(1 - age)
        out[:, i:i + len(t)] += envelope * np.sin(2 * np.pi * hz * t + lead)
    s, db, _, _ = np.transpose(CLACKS)
    edge = from_db(-13.0) * colour(crack(s, db, t60=0.0074, snap=8.3), RIM_CRACK, FAR_SIDE)
    return out * panned(CLACK_SIDE_DB)[:, None] + edge


def chatter(count):
    """Repeated impact: uneven contacts that settle fast at the end; rows (s, plate dB, steel dB, table dB)."""
    rows = []
    for start, length, plate_db, steel_db, table_db, plate_fade, steel_fade in RATTLES:
        step = np.arange(count)
        chance = rng.uniform(-1, 1, (3, count)) * (step > 0)
        age = CHATTER_GAP_S * (step + CHATTER_JITTER * chance[0])
        settle_db = SETTLE_DB_PER_S * np.maximum(age - length, 0)
        plate = plate_db - plate_fade * age + CHATTER_SCATTER_DB * chance[1]
        steel = steel_db - steel_fade * age + CHATTER_SCATTER_DB * chance[2]
        levels = [plate - settle_db, steel - settle_db, table_db - settle_db]
        rows.append(np.transpose([start + age, *levels]))
    return np.vstack(rows)


def steel_crowd(count):
    """Modal density: many weak overtones of bowls, tines and handles; rows (Hz, dB, t60 s, left-right dB)."""
    hz = np.linspace(CROWD_LOW_HZ, CROWD_HIGH_HZ, count) * (1 + .015 * rng.standard_normal(count))
    return np.transpose([hz, at_hz(STEEL_CRACK, hz), np.full(count, CROWD_T60_S), at_hz(PLATE_SIDE, hz)])


def cutlery(rattles):
    """Unequal damping: loose steel chatters on the plate, which clacks on its mat while the steel rings on."""
    s, plate_db, steel_db = np.vstack([np.array(CLINKS)[:, :3], rattles[:, :3]]).T
    plate_hits = rebounds(s, plate_db, count=3, gap_s=0.0038, loss_db=2.5)
    steel_hits = rebounds(s, steel_db, count=3, gap_s=0.004, loss_db=1.5)
    plate = from_db(3.0) * colour(crack(*plate_hits, t60=0.015, snap=5.64), PLATE_CRACK, PLATE_SIDE)
    plate += from_db(-8.5) * ring(s, plate_db, PLATE_MODES, scatter_db=4.5, detune=0.015)
    steel = from_db(-0.5) * colour(crack(*steel_hits, t60=0.018, snap=3.9), STEEL_CRACK, PLATE_SIDE)
    # wide scatter: every contact brings out different overtones
    steel += from_db(-22.5) * ring(s, steel_db, steel_crowd(count=56), scatter_db=7.5, detune=0.004)
    # the fork rings with each blow on the plate, the spoon when steel meets steel
    fork = from_db(-20.0) * ring(s, plate_db, FORK_MODES, scatter_db=4.0, detune=0.0023)
    spoon_db = steel_db + NESTED_DB * (s < PARTED_S)
    spoon = from_db(-11.0) * ring(s, spoon_db, SPOON_MODES, scatter_db=3.5, detune=0.0031)
    return plate + steel + fork + spoon + favoured(CLINKS, PLATE_SIDE)


def treble_gate(x, edge_hz, open_db, depth_db, knee_db):
    """Downward expansion: a noise suppressor turns the treble down whenever it is faint."""
    high_pass = signal.butter(8, edge_hz, "high", fs=SR, output="sos")
    treble = signal.sosfiltfilt(high_pass, x)
    power = uniform_filter1d(np.mean(treble ** 2, axis=0), size=1024)
    level_db = 10 * np.log10(np.maximum(power, 1e-14))
    shut = np.clip((open_db - level_db) / knee_db, 0, 1)
    return x - treble * (1 - from_db(-depth_db * shut))


def scene():
    """Superposition: each source sounds directly and through the room, over the room tone."""
    rattles = chatter(count=16)
    steel = cutlery(rattles) + taps()
    table = knocks() + table_shake(rattles) + drag()
    sheets = rustle() + crinkle_snaps()
    hard = clacks()
    squeal, squeal_feed = squeaks()
    feed = from_db(-0.5) * steel + from_db(3.5) * table + from_db(-4.0) * sheets
    feed += from_db(-2.0) * hard + squeal_feed
    direct = steel + table + sheets + hard + squeal
    return direct + room(feed, build_s=0.0017) + room_tone()


def record(dry):
    """Band limiting: faint treble is gated and the top is cut off steeply."""
    gated = treble_gate(dry, edge_hz=2990, open_db=-64.5, depth_db=24.0, knee_db=6.5)
    low_pass = signal.ellip(10, .2, 90, CUTOFF_HZ, fs=SR, output="sos")
    return signal.sosfilt(low_pass, gated)


dry = scene()
out = record(dry)
master(out)
```